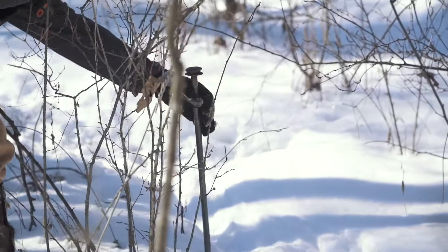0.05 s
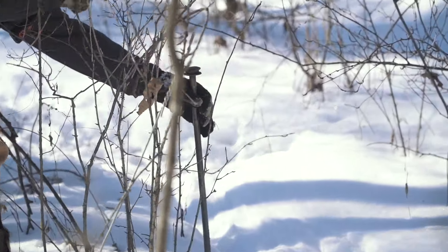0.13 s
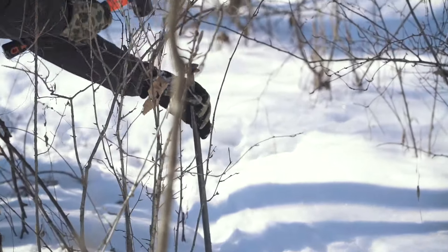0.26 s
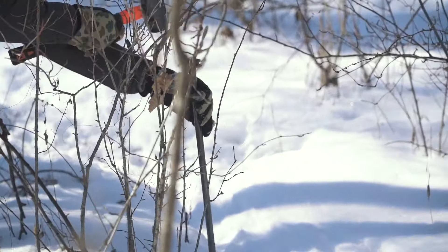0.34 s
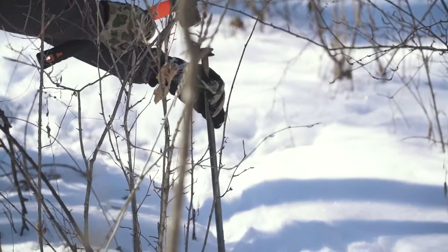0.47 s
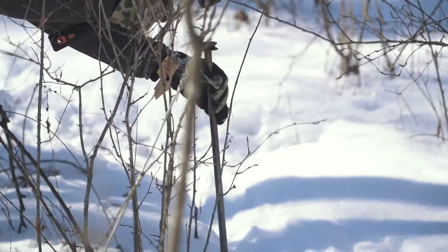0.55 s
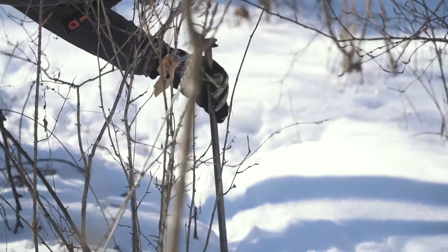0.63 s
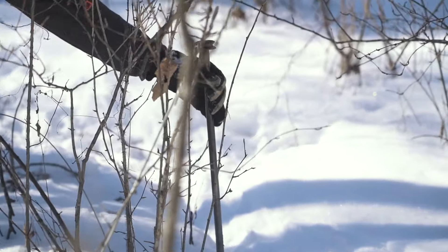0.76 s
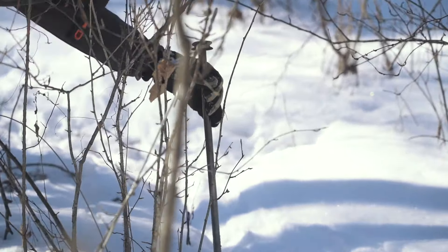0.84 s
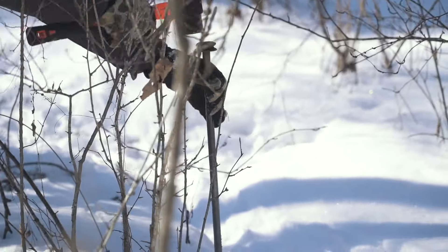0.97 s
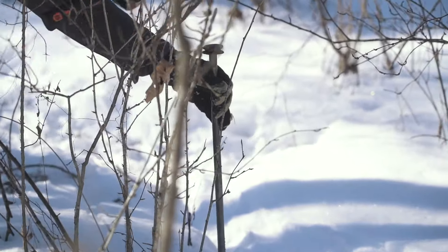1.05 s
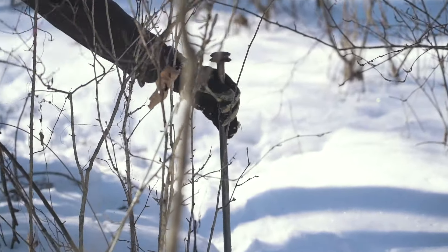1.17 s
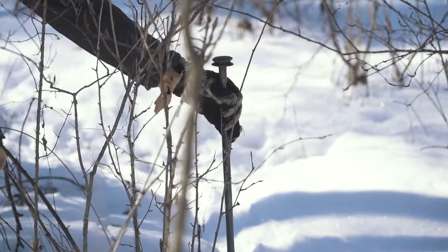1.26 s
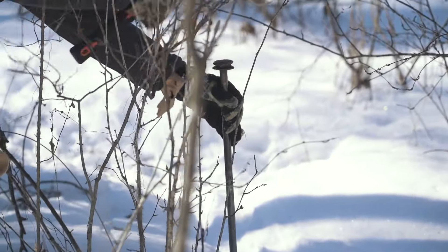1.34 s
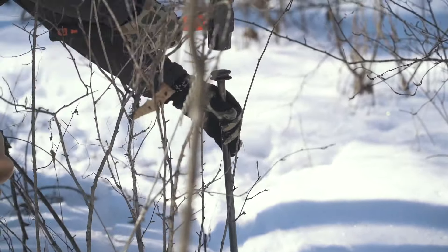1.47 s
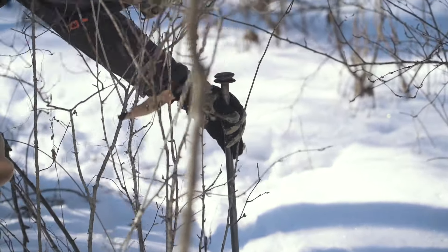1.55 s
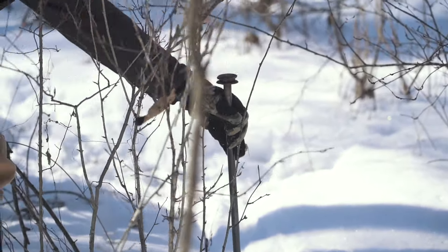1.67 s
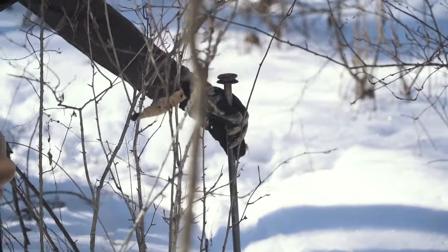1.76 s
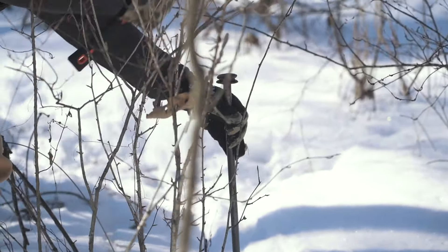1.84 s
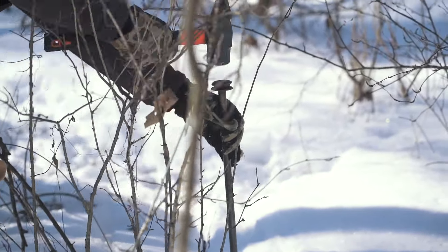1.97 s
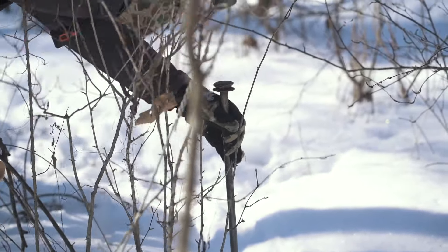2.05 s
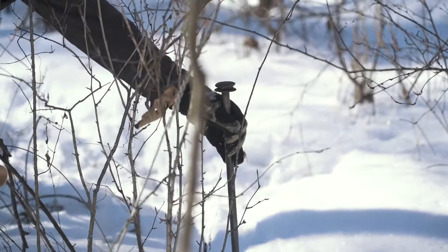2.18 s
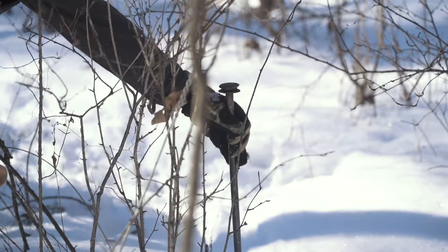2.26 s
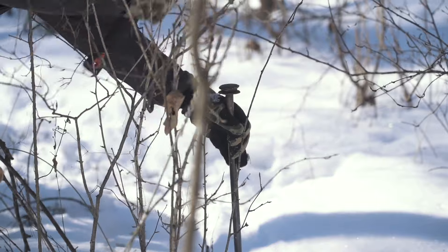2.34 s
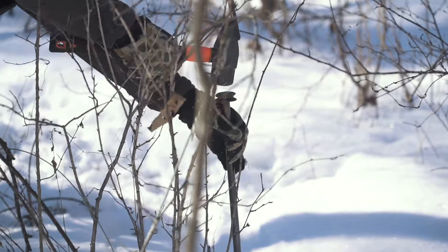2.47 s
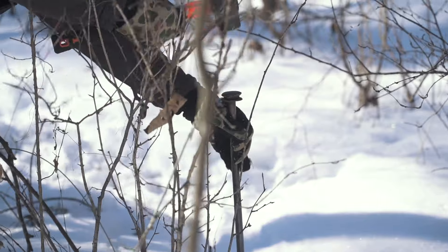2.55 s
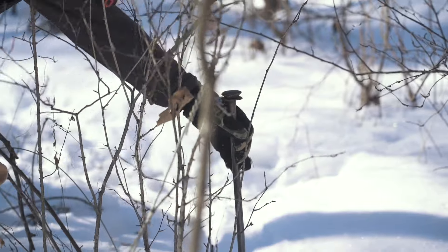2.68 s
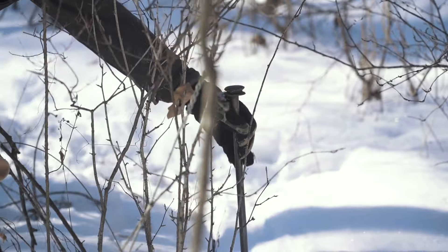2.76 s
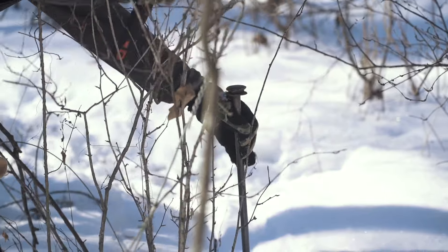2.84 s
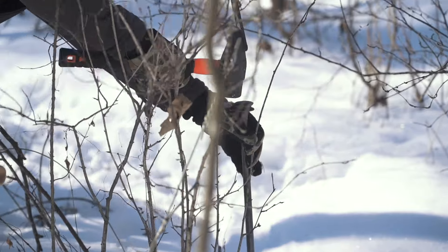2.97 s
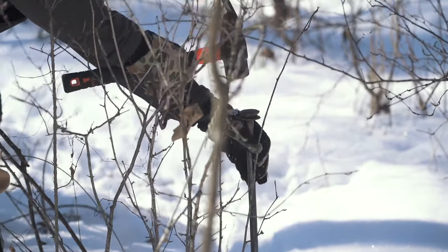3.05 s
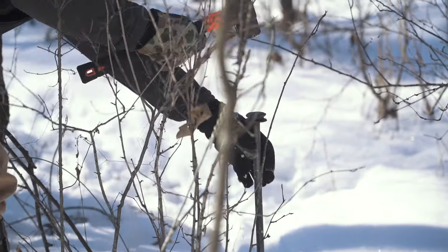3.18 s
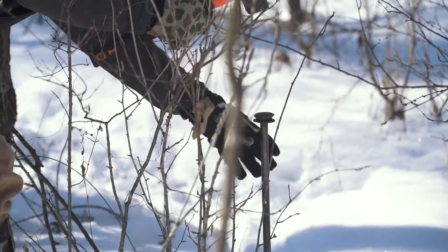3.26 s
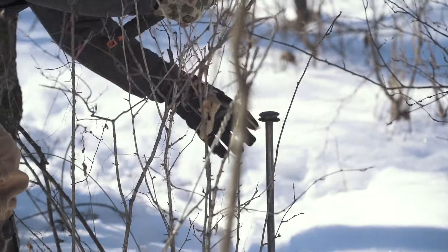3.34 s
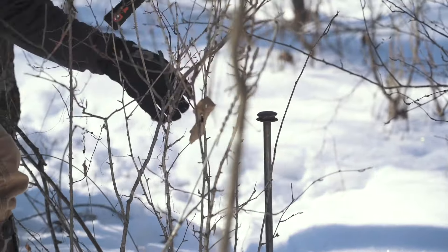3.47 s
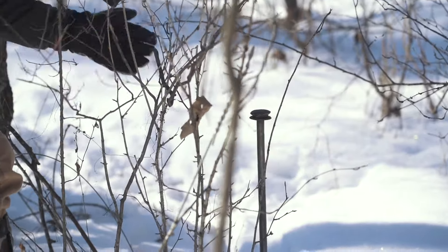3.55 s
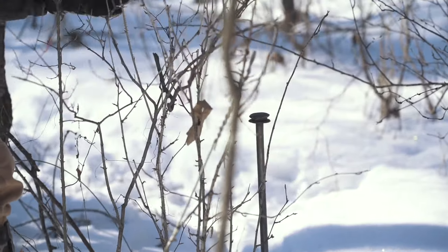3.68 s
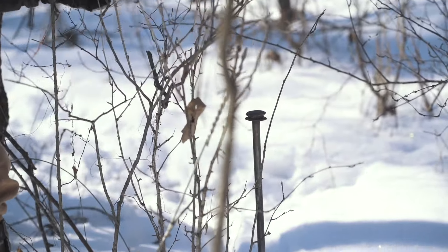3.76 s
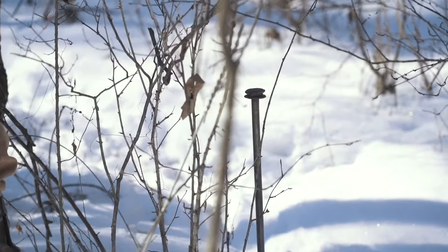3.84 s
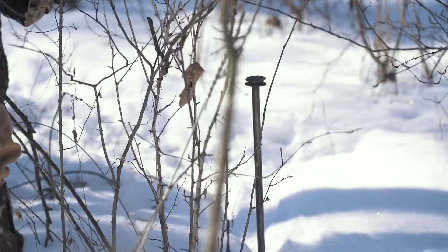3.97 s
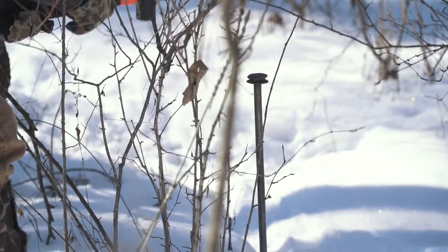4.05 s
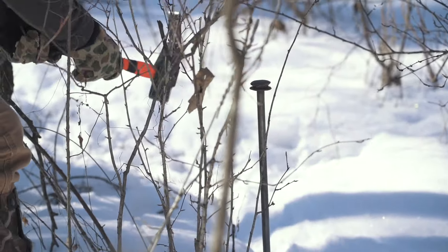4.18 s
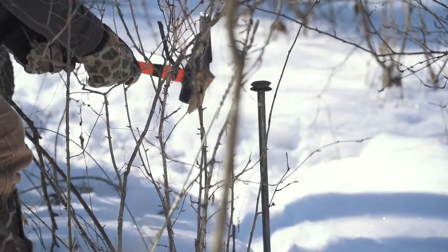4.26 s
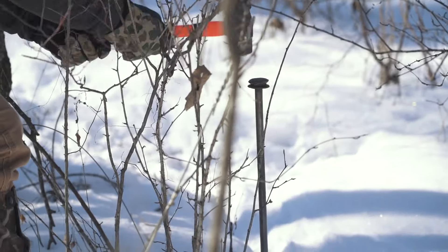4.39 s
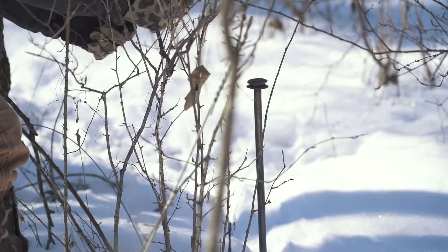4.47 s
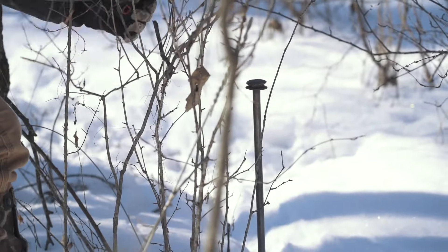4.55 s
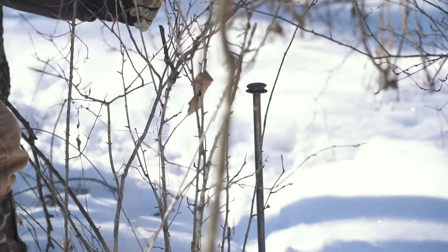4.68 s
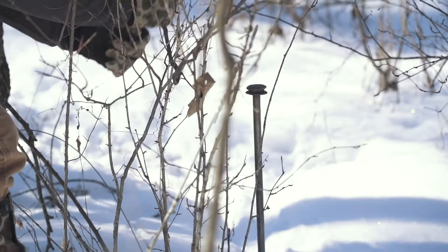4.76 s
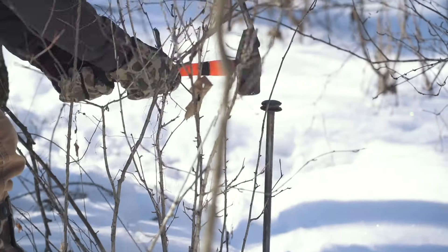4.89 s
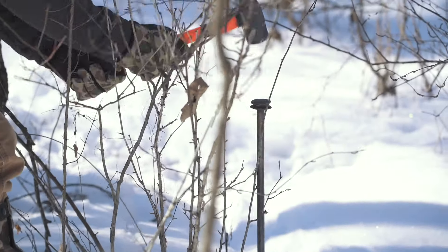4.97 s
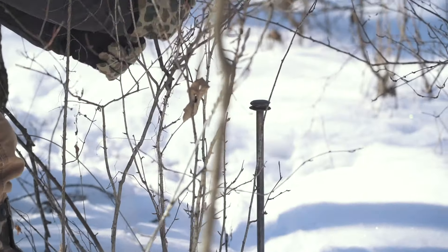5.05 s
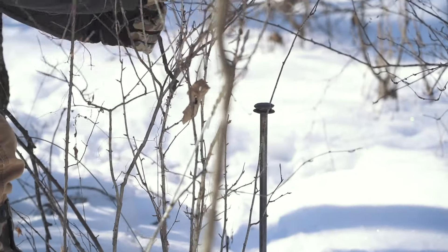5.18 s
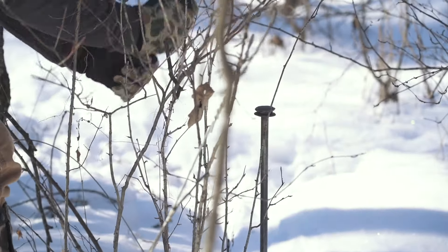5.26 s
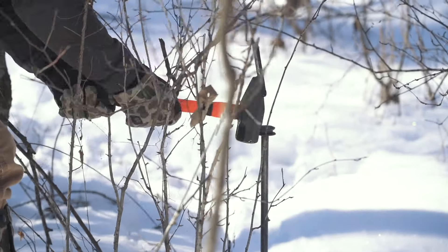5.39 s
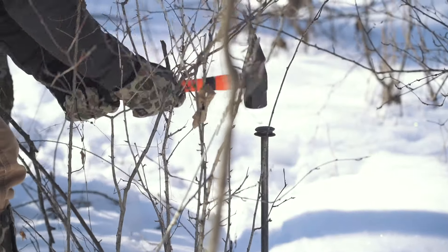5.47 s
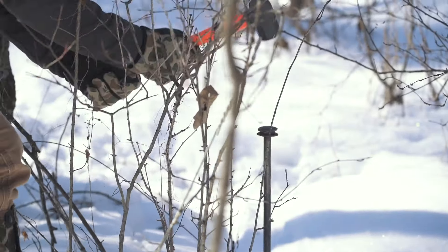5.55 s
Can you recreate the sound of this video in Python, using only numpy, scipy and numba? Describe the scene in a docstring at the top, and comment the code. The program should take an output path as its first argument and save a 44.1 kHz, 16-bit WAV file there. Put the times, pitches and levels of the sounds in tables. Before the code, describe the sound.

A hammer drives a steel stake into frozen ground among bare trees, about a step from a small microphone. Faint outdoor hiss and soft, low wind buffeting run throughout, with tiny twig ticks. Stiff sleeves swish and scrape lightly during the first second. Five loud blows then land evenly, at about 1.0, 1.5, 2.0, 2.5 and 3.0 seconds. Each is a sharp, slightly clipped crack with a small thud, a brief high metallic ring that varies from hit to hit, and a short, diffuse echo from the trunks. A quick sleeve swish leads into each swing. From 3.1 to 4.8 seconds the hammering pauses, leaving a soft dull knock near 3.6 seconds, light scrapes of cloth and twigs, and a longer swish around 4.5 seconds. Two more ringing blows come at 4.9 and 5.4 seconds, the last with an immediate hard bounce of the hammer head.

```python
"""Hammering a steel stake

A hammer drives a steel stake into snowy ground among bare trees, a step from a small microphone.
Each blow cracks, thuds and rings the modes of head and stake; the trunks scatter it back.
Sleeves swish and scrape, twigs tick, wind buffets the microphone port over a faint hiss of air.
The blows overload the input, and its gain control ducks and recovers."""
import sys
import numpy as np
from scipy import signal
from scipy.fft import rfft, irfft, next_fast_len
from scipy.io import wavfile
from scipy.ndimage import uniform_filter1d, minimum_filter1d
from numba import njit

SR = 44100
rng = np.random.default_rng(int(sys.argv[2]) if len(sys.argv) > 2 else 0)


def put_to_file(sound):
    """Save the sound as 16-bit audio at rate SR, in the file named by the first command-line argument."""
    columns = np.atleast_2d(sound).T  # one column per channel
    safe = np.clip(columns, -1, 1)
    whole_steps = np.round(safe * 32767)
    wavfile.write(sys.argv[1], SR, whole_steps.astype(np.int16))


N = 247842
T = np.arange(N) / SR


def amp(db):
    return 10 ** (np.asarray(db) / 20)


def unit_rms(x):
    return x / np.sqrt(np.mean(x ** 2))


def shaped_noise(points):
    """Noise of rms 1 with a (Hz, dB) spectrum, 20 dB down an octave beyond each end."""
    (low_hz, low_db), (high_hz, high_db) = points[0], points[-1]
    hz, db = np.transpose([(low_hz / 2, low_db - 20), *points, (high_hz * 2, high_db - 20)])
    size = next_fast_len(N)
    bin_hz = np.maximum(np.arange(size // 2 + 1) * SR / size, 1)
    gain = amp(np.interp(np.log(bin_hz), np.log(hz), db))
    return unit_rms(irfft(rfft(rng.standard_normal(size)) * gain, size)[:N])


def band(x, hz, width_hz):
    edges_hz = max(hz - width_hz / 2, hz / 4), min(hz + width_hz / 2, .45 * SR)
    return signal.sosfilt(signal.butter(2, edges_hz, "bandpass", fs=SR, output="sos"), x)


def walk(rate_hz):
    """Ramps between random levels; spread near 1."""
    step = int(SR / rate_hz)
    levels = np.repeat(rng.standard_normal(N // step + 1), step)
    return 1.2 * uniform_filter1d(levels, step)[:N]


def fade(t, t60_s):
    return np.exp(-np.log(1000) * t / t60_s)


def add(out, start_s, x):
    i = int(start_s * SR)
    out[i:i + len(x)] += x[:len(out) - i]


@njit
def follow(x, attack_s, release_s):
    """Envelope with separate rise and fall time constants."""
    level, out = 1e-6, np.empty(len(x))
    for i in range(len(x)):
        level += (x[i] - level) / (SR * (attack_s if x[i] > level else release_s))
        out[i] = level
    return out


# Five groups of modes. Each row: frequency in Hz, level in dB, base t60 in seconds.
HEAD_MODES = [(3707, -2.5, 0.033), (3737, -16.5, .12), (7720, -9, 0.024), (6880, -26, 0.054)]
LONG_NOTE_MODES = [(5914, -15.5, 0.56), (5940, -10.5, 0.25), (9930, -20.5, 0.12), (9180, -25, .1),
                   (12170, -23, 0.092)]
LENGTHWISE_MODES = [(7080, -13.5, 0.075), (8380, -10.5, 0.065), (9770, -14, 0.069), (11440, -20.5, 0.18),
                    (13500, -15.5, 0.13), (15100, -21, .09), (16130, -31, 0.092)]
BENDING_MODES = [(4470, -20.5, 0.27), (5600, -15.5, .12), (11400, -23, 0.094), (2460, -25, 0.15)]
LOW_MODES = [(1199, -12, 0.25), (1680, -19, .06), (880, -23, .08)]


def steel_ring(t, groups_db, t60_scale):
    """Head and stake ring in decaying modes that waver as the stake shakes."""
    out = np.zeros(len(t))
    groups = HEAD_MODES, LONG_NOTE_MODES, LENGTHWISE_MODES, BENDING_MODES, LOW_MODES
    for modes, group_db in zip(groups, groups_db):
        draws = rng.standard_normal((len(modes), 3))
        for (hz, db, t60_s), (spread, detune, phase) in zip(modes, draws):
            waver_db = 2.5 * np.interp(t, np.arange(50) / 100, rng.standard_normal(50))
            tone = np.sin(2 * np.pi * (hz * (1 + .0008 * detune) * t + phase))
            out += amp(db + group_db + waver_db + 1.5 * spread) * fade(t, t60_scale * t60_s) * tone
    return out


# Each row: start in seconds, force in dB, crack treble in dB, ring in dB for each of the five groups
# (head, long note, lengthwise, bending, low), thud in dB, thud pitch in Hz, t60 scale.
BLOWS = [(0.9930, 14.6, -29, -8, -16, 0, 1, -13.5, 4, 770, 0.35),
         (1.4584, 15.6, -7, -14, -4, 0.5, -3, -21.5, 4.5, 663, 0.23),
         (1.9628, 11.9, -11.5, 1.5, 0.5, -3, -6, -11, 8, 1100, 0.3),
         (2.4704, 14.6, -36, -1.5, 0.5, -15.5, -3.5, -8.5, 0, 1020, 0.5),
         (2.9857, 10, -27, 5.5, 0.5, -11.5, -17, -10, 3, 1040, 0.4),
         (4.9120, 8.7, -2, -3.5, -16, -3, -1.5, -9, 4, 900, 0.66),
         (5.4047, 4.7, -11.5, -2, -13, 1.5, 5, -4, -4.5, 900, 0.47)]
# The head bounces back onto the stake. Each row: start in seconds, force in dB.
REBOUNDS = [(2.4759, 6), (2.9935, 7), (4.9226, 6), (5.4233, 20)]


def hammer_blows():
    """Each contact cracks, rings the steel according to where it lands, and thuds into the ground."""
    out, t = np.zeros(N), T[:SR // 2]
    for start_s, force_db, treble_db, *groups_db, thud_db, thud_hz, t60_scale in BLOWS:
        body, treble, ground = rng.standard_normal((3, len(t)))
        crack = amp(5.5) * band(body, 2310, 11900) + amp(4.5 + treble_db) * band(treble, 9350, 11300)
        thud = band(ground, 560, 960) + amp(-11) * np.sin(2 * np.pi * thud_hz * t)
        thump = amp(-12.5) * np.sin(2 * np.pi * 240 * t)
        hit = crack * fade(t, 0.0076) + steel_ring(t, groups_db, t60_scale)
        hit += amp(thud_db) * (thud * fade(t, 0.014) + thump * fade(t, 0.012))
        add(out, start_s, amp(force_db) * hit)
        for rebound_s, rebound_db in REBOUNDS:
            if 0 < rebound_s - start_s < 0.05:
                add(out, rebound_s, amp(rebound_db) * hit * fade(t, 0.0057))
        # Frozen ground carries a dull jolt just ahead of the airborne crack.
        add(out, start_s - .0016, -amp(-12.5) * np.hanning(SR // 800))
    return out


# Echo bands. Each row: centre in Hz, t60 in seconds, level in dB.
ECHO_BANDS = [(503, 0.3, 2), (1850, 0.56, -3.5), (6440, 0.69, -3), (12800, 0.3, 8)]


def trunk_echo(hits, gain_db=-5):
    """Trunks at many distances send the sound back as a diffuse swell."""
    t = T[:SR]
    response = sum(amp(db) * band(rng.standard_normal(SR), hz, 1.16 * hz) * fade(t, t60_s)
                   for hz, t60_s, db in ECHO_BANDS)
    response *= np.interp(t, [0.032, 0.043], [0.56, 1])  # weaker early returns
    response /= np.sqrt(np.sum(response ** 2))
    return amp(gain_db) * signal.fftconvolve(hits, response)[:N]


# Cloth spectra. Each row: frequency in Hz, level in dB.
CLOTH_BODY = [(600, -1.5), (1200, 2.5), (2500, 0), (4000, 0), (5000, 0), (6000, -5)]
CLOTH_TREBLE = [(7500, 14.5), (9600, 10), (13500, 7.5)]
# Each row: start in seconds, length in seconds, level in dB, centre in Hz, relative treble in dB.
SWISHES = [(0.188, 0.23, -39, 1200, -7), (0.659, 0.165, -32, 1760, -11.5),
           (0.878, 0.035, -21.5, 1820, -12.5), (0.936, 0.01, -22.5, 2200, -10),
           (0.952, 0.028, -41, 2500, -1), (1.051, 0.17, -26, 1290, -18), (1.375, 0.048, -34.5, 1500, -11),
           (1.41, 0.053, -29.5, 2500, 0), (1.871, 0.025, -35.5, 1500, -12), (1.908, 0.047, -30, 1800, -4),
           (2.362, 0.045, -36, 1300, -4), (2.421, 0.041, -30, 1800, -6), (2.911, 0.066, -30.5, 1780, -12),
           (4.461, 0.26, -26, 3300, -5), (4.761, 0.092, -28.5, 2000, -8.5),
           (4.852, 0.047, -32.5, 2000, -10), (5.097, 0.12, -28.5, 1810, -9),
           (5.294, 0.055, -20.5, 2460, -11.5), (5.373, 0.023, -27, 3000, -8)]


def sleeves(rise_share=0.4, sag_db=2, stop_s=0.0081):
    """Stiff fabric slides over itself in grainy slips: each swish swells, sags and stops."""
    grain = amp(2.5 * walk(90) + 2.3 * walk(1000))
    body = unit_rms(grain * shaped_noise(CLOTH_BODY))
    treble = unit_rms(grain * shaped_noise(CLOTH_TREBLE))
    out = np.zeros(N)
    for start_s, length_s, db, hz, treble_db in SWISHES:
        progress = (T - start_s) / length_s
        swell = np.clip(progress / rise_share, 0, 1)
        sag = amp(np.interp(progress, [rise_share, 1], [0, -sag_db]))
        stop = np.exp(-np.maximum(T - start_s - length_s, 0) / stop_s)
        friction = unit_rms(band(body, hz, 1.9 * hz)) + amp(treble_db) * treble
        out += amp(db) * swell * sag * stop * friction
    return out


# Each row: start in seconds, level in dB, centre in Hz, relative treble in dB.
SCRAPES = [(0.175, -27.5, 905, -22), (0.895, -19.5, 1660, -20), (0.946, -11, 2200, -21),
           (1.185, -14.5, 1010, -28), (1.372, -31, 960, -13), (1.413, -18, 1020, -13),
           (1.917, -29, 940, -2), (2.423, -31, 1250, -2), (2.452, -20.5, 2500, -13),
           (2.931, -30.5, 1010, 4), (3.524, -40, 1250, 3), (3.726, -28, 1970, -7),
           (3.868, -31.5, 2700, -15), (3.995, -30.5, 2500, -7), (4.119, -34, 1550, -17),
           (4.288, -28.5, 1520, -16), (4.685, -26, 3060, -12), (4.733, -37, 1500, -21),
           (4.797, -21.5, 2660, -15), (4.817, -22, 1200, -18), (4.841, -12.5, 1680, -18),
           (4.865, -22, 1150, -25), (5.284, -25.5, 1240, -22), (5.313, -22.5, 3350, -20),
           (5.38, -20.5, 3020, -2)]


def scrapes(rise_s=0.0019):
    """Cloth and twigs catch briefly, each a burst of noise around a centre pitch."""
    out, t = np.zeros(N), T[:SR // 10]
    envelope = t / rise_s * np.exp(1 - t / rise_s)
    for start_s, db, hz, treble_db in SCRAPES:
        body, treble = rng.standard_normal((2, len(t)))
        body = unit_rms(band(body, hz, 1.22 * hz))
        treble = unit_rms(band(treble, 8000, 13000))
        add(out, start_s, amp(db) * envelope * (body + amp(treble_db) * treble))
    return out


# Each row: start in seconds, level in dB, pitch in Hz.
KNOCKS = [(0.174, -23, 124), (1.375, -14, 172), (3.561, -20.5, 171)]


def knocks():
    """Dull knocks, each one low damped tone."""
    out, t = np.zeros(N), T[:SR // 10]
    for start_s, db, hz in KNOCKS:
        add(out, start_s, amp(db) * np.sin(2 * np.pi * hz * t) * fade(t, t60_s=0.058))
    return out


def twigs(snaps_per_s=14):
    """Frozen twigs give tiny bright snaps at random moments, mostly faint."""
    when, faintness = rng.random((int(snaps_per_s * N / SR), 2)).T
    snaps = np.zeros(N)
    snaps[(when * N).astype(int)] = amp(-42 - 6.3 * np.log(faintness + .01))
    burst = rng.standard_normal(SR // 200) * fade(T[:SR // 200], t60_s=.004)
    return band(signal.fftconvolve(snaps, burst)[:N], 12000, 7000)


# Each row: time in seconds, buffeting in dB, rumble in dB.
GUSTS = [(0.0, -13, -34), (0.41, -12.5, -31.5), (1.47, -19.5, -35), (1.66, -21.5, -37), (1.81, -21, -46),
         (2.02, -14, -36), (2.41, -19, -35), (2.47, -14.5, -34.5), (3.47, -17, -30), (4.04, -11, -34.5),
         (4.43, -18.5, -34), (4.76, -13.5, -32), (4.9, -11.5, -35), (5.23, -15, -29), (5.38, -14, -36),
         (5.62, -24, -38)]
# Each row: frequency in Hz, relative density in dB.
BUFFET_SPECTRUM = [(2.9, -60), (5.0, 4.5), (16, 9.5), (23, 1), (35, -4), (43, -1.5), (60, -14.5), (78, -63),
                   (130, -120)]
RUMBLE_SPECTRUM = [(50, 2), (100, -1.5), (200, -9), (400, -22)]


def wind():
    """Eddies at the microphone port: slow buffeting with a fluttering rumble on top."""
    time_s, buffet_db, rumble_db = np.transpose(GUSTS)
    buffet = amp(np.interp(T, time_s, buffet_db)) * shaped_noise(BUFFET_SPECTRUM)
    rumble = amp(np.interp(T, time_s, rumble_db) + 2.3 * walk(14)) * shaped_noise(RUMBLE_SPECTRUM)
    return buffet + rumble


# Each row: frequency in Hz, relative density in dB.
AIR_SPECTRUM = [(120, -0.5), (200, -9.5), (328, -10.5), (509, -8.5), (696, -16), (916, -12.5), (1420, -18),
                (1530, -15.5), (2090, -19.5), (2650, -17.5), (3370, -20), (7270, -21), (16000, -38)]


def air(level_db=-36.5):
    """Faint outdoor hiss that wavers slightly."""
    return amp(level_db + .5 * walk(3) + .5 * walk(40)) * shaped_noise(AIR_SPECTRUM)


def scene():
    hits, hiss = hammer_blows(), air()
    return (hits + trunk_echo(hits) + sleeves() + scrapes() + knocks() + twigs() + wind() + hiss)[None]


def record(dry):
    """Gain control ducks, holds and recovers on overloads, too late to stop the first clipping."""
    limit_db, max_duck_db, cutoff_hz = -0.5, 12, 15900
    hold = int(0.038 * SR)
    held_peak = -minimum_filter1d(-np.abs(dry[0]), size=hold, origin=(hold - 1) // 2)
    over_db = np.clip(20 * np.log10(held_peak + 1e-9) - limit_db, 0, max_duck_db)
    duck_db = follow(over_db, attack_s=0.0026, release_s=0.0092)
    clipped = np.clip(dry * amp(-duck_db), -.95, .95)
    lowpass = signal.ellip(8, .2, 70, cutoff_hz, fs=SR, output="sos")
    return np.clip(signal.sosfilt(lowpass, clipped), -1, 1)


dry = scene()
out = record(dry)
put_to_file(out)
```